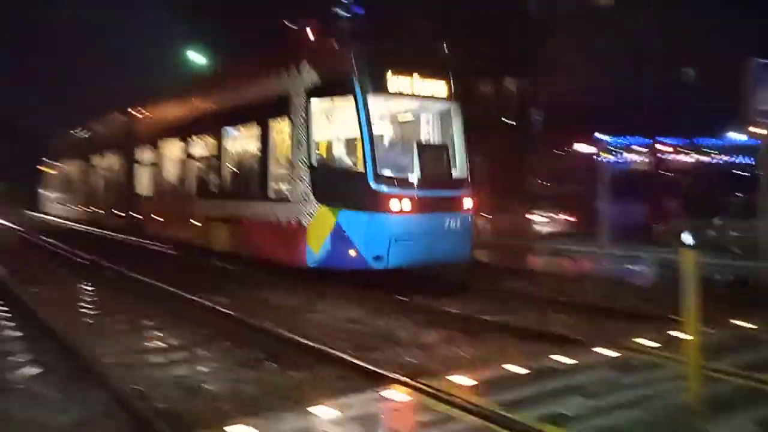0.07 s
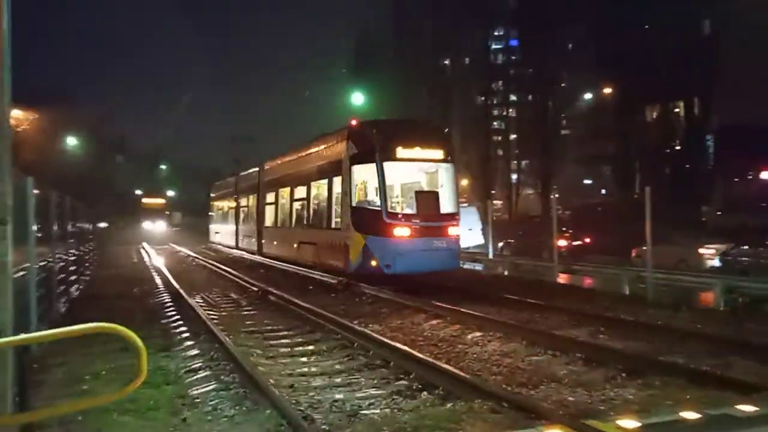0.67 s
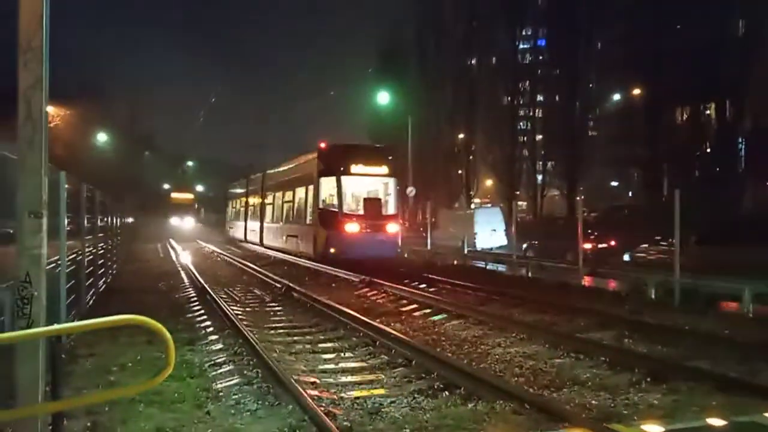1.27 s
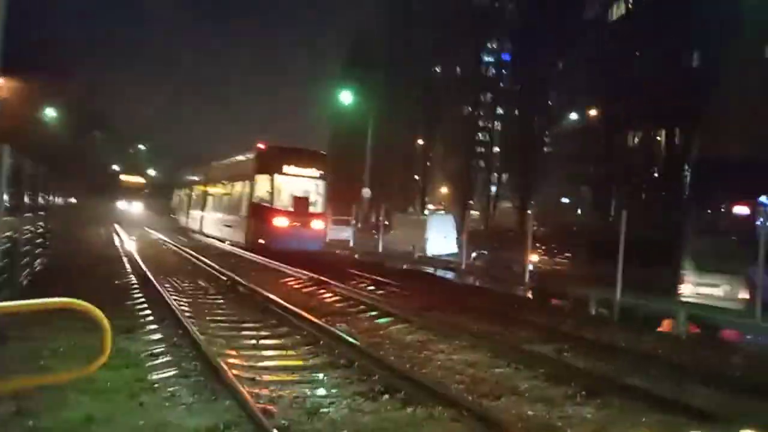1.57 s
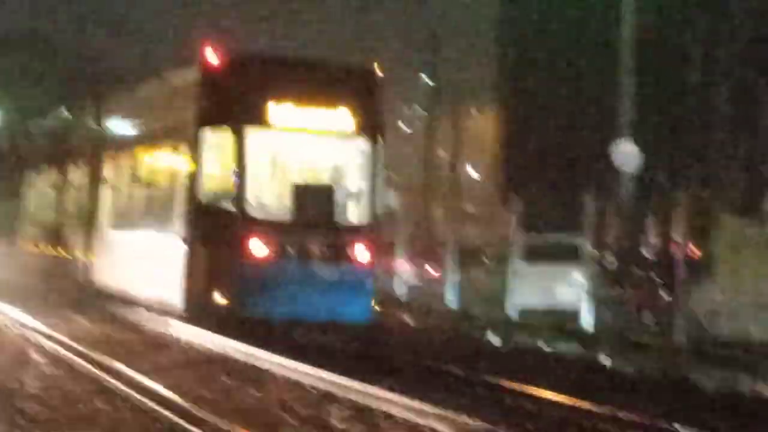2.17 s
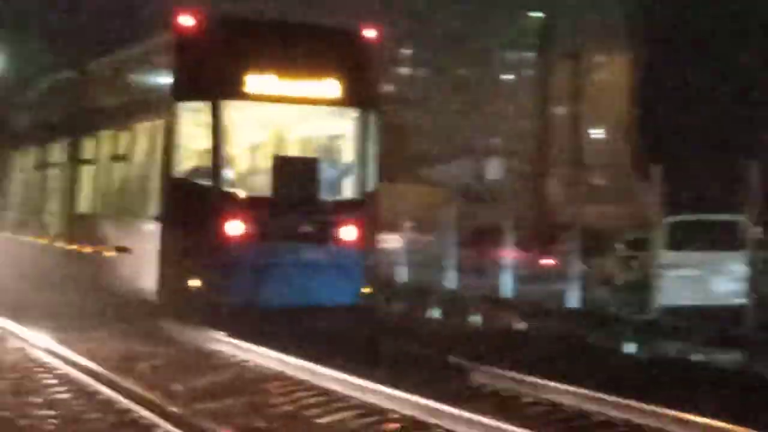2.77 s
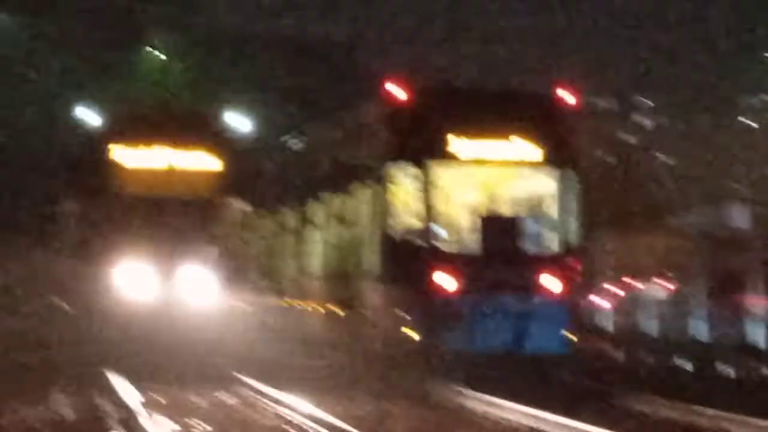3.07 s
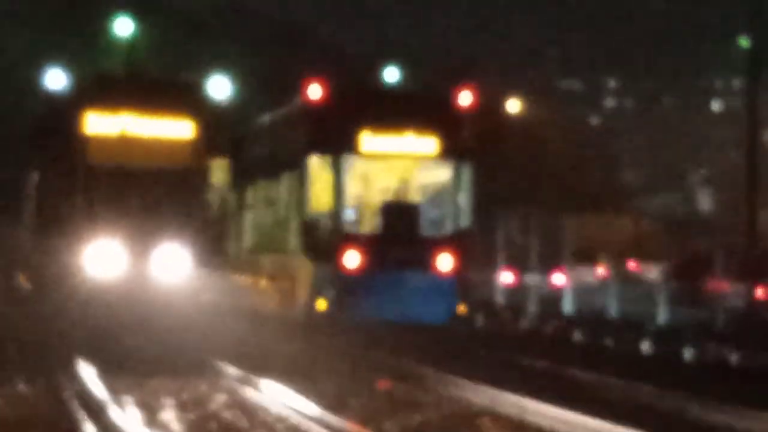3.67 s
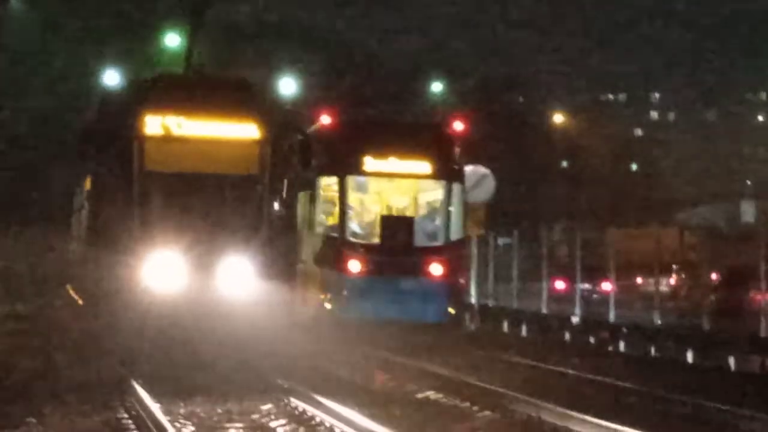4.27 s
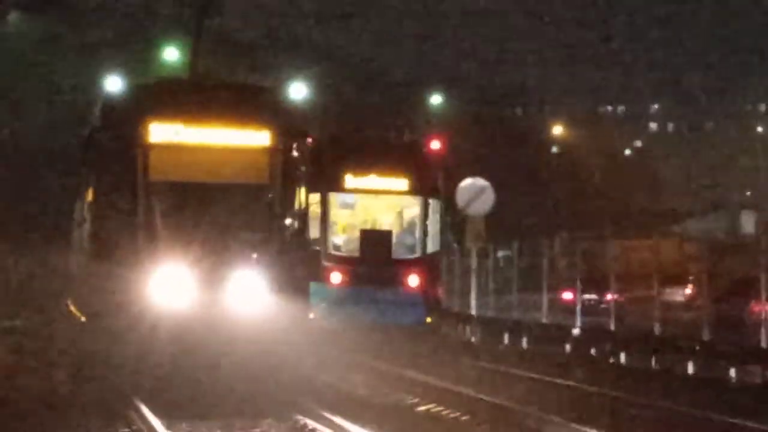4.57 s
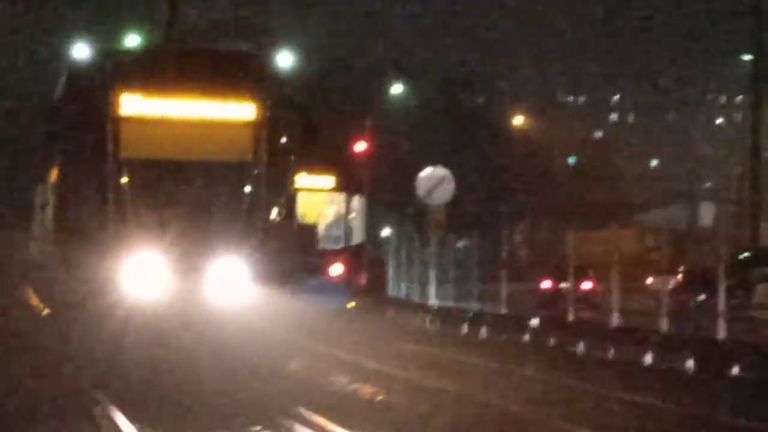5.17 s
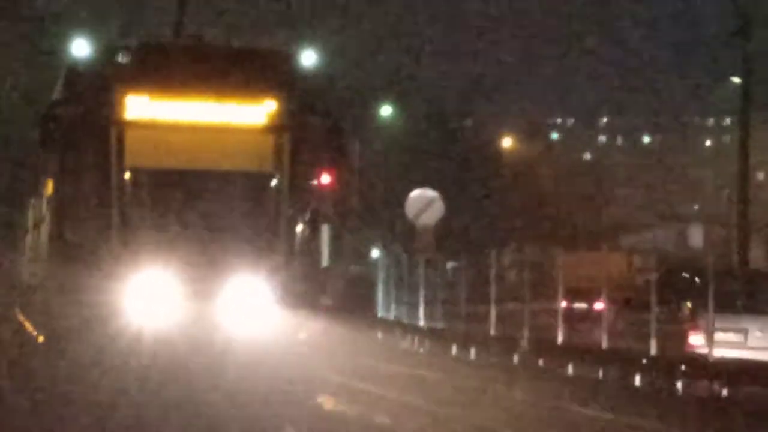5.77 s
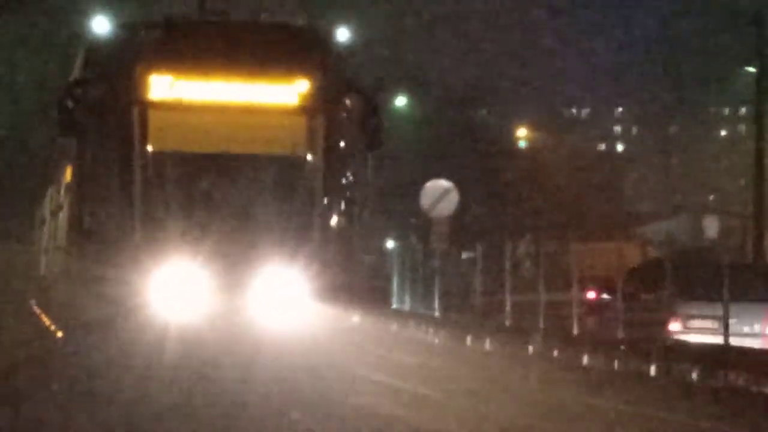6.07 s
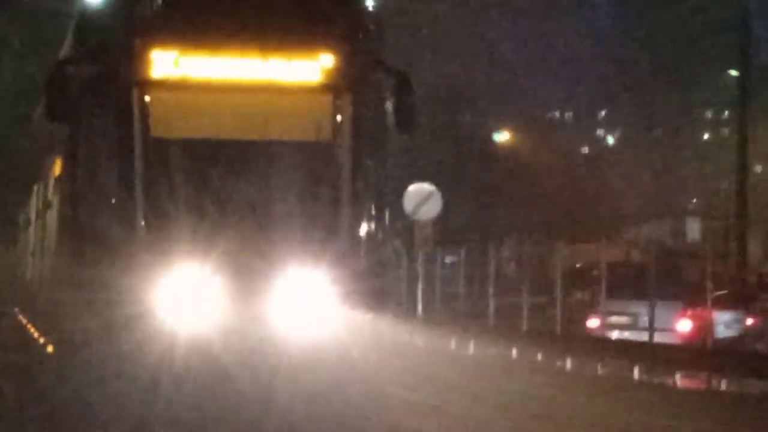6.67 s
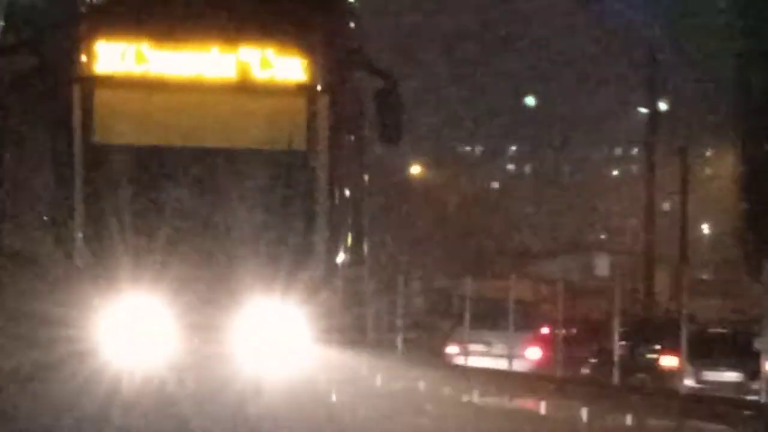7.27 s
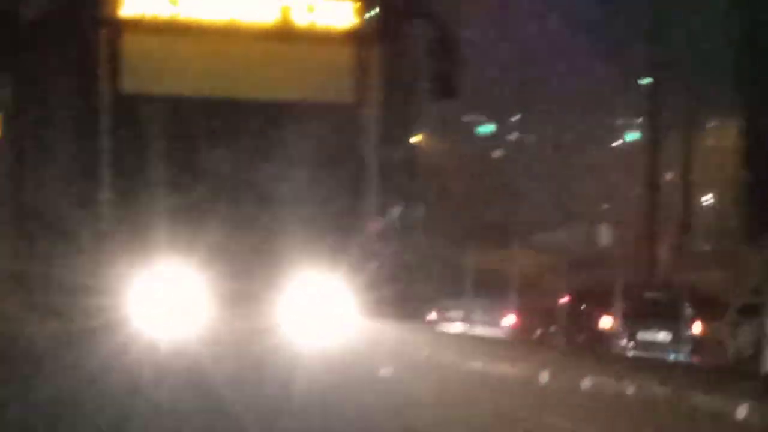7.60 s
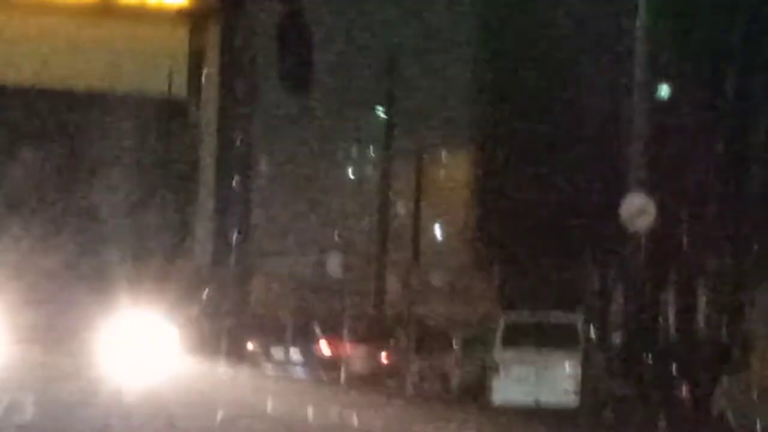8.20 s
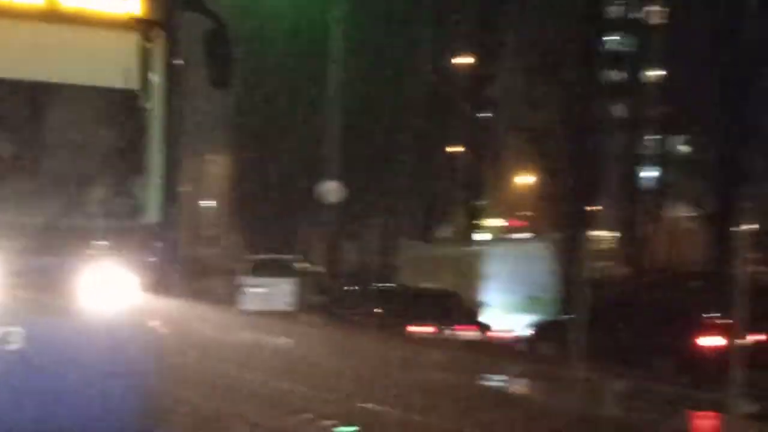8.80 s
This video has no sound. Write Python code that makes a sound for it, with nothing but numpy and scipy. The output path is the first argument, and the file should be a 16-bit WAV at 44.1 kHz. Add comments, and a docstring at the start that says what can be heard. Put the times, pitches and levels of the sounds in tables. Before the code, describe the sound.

Outdoors, close to the tracks, tram wheels roar and hiss on wet rail, clacking twice over a humming motor. Loud rubbing and low thumps soon take over as a finger seals the handheld microphone. From then on the street is a dull, low rumble, one tram fading and another slowly nearing. Scattered finger rubs and knocks sound on top, pause for about three seconds, then return briefly.

```python
"""Rumble and wheel hiss of a tram rolling away on wet rails at night, with a motor drone and two clacks.
After a second and a half a finger slides over the microphone port and seals it, an acoustic low-pass.
From then on the street is a muffled rumble, one tram fading as the next draws near, while the
shifting grip rubs by stick-slip friction and thumps by pressing air into the port."""
import sys
import numpy as np
from scipy import signal
from scipy.fft import rfft, irfft
from scipy.io import wavfile

SR = 44100
rng = np.random.default_rng(int(sys.argv[2]) if len(sys.argv) > 2 else 0)


def log_audio(samples):
    """Write samples as a 16-bit WAV file to the path given in sys.argv[1]."""
    # one column per channel
    frames = np.atleast_2d(samples).T
    # limit to full scale, then quantise
    limited = np.clip(frames, -1, 1)
    pcm = np.round(limited * 32767).astype(np.int16)
    wavfile.write(sys.argv[1], SR, pcm)


N = 398663
TIME_S, FREQ_HZ = np.arange(N) / SR, np.fft.rfftfreq(N, 1 / SR)


def amp(db):
    return 10 ** (np.asarray(db) / 20)


def unit(x):
    return x / np.sqrt(np.mean(x ** 2) + 1e-20)


def add(mix, start_s, sound):
    part = mix[round(start_s * SR):][:len(sound)]
    part += sound[:len(part)]


def curves(rows):
    """Linear interpolation of each column over time."""
    times, *columns = np.transpose(rows)
    return [np.interp(TIME_S, times, column) for column in columns]


def swell(start, rise, hold, release):
    """Raised-cosine envelope of height 1; times in seconds."""
    out, length = np.zeros(N), rise + hold + release
    t = np.arange(0, length, 1 / SR)
    ramp = np.clip(np.minimum(t / rise, (length - t) / release), 0, 1)
    add(out, max(start, 0), np.sin(np.pi / 2 * ramp) ** 2)
    return out


def filtered_noise(gain, size=N):
    """Source and filter: white noise weighted by a gain per frequency, at rms 1."""
    return unit(irfft(rfft(rng.standard_normal(size)) * gain, size))


def noise(spectrum):
    """Broadband noise whose spectral envelope is interpolated over log frequency."""
    hz, db = np.transpose(spectrum)
    return filtered_noise(amp(np.interp(np.log(FREQ_HZ + 1), np.log(hz + 1), db)))


def waver(rate_hz):
    """Random modulation: low-pass noise of rms 1."""
    return filtered_noise(np.exp(-(FREQ_HZ / rate_hz) ** 2))


def split(x, edges_hz):
    """Complementary crossover: the bands sum to x."""
    lowpasses = [1 / (1 + (FREQ_HZ / edge) ** 8) for edge in edges_hz]
    return irfft(rfft(x) * np.diff(lowpasses, axis=0, prepend=0, append=1), N)


def resonant_bursts(rows):
    """A randomly driven resonance gives a band of noise; each one swells and dies."""
    out = np.zeros(N)
    for start_s, length_s, db, centre_hz, width_hz in rows:
        size = round(length_s * SR)
        resonance = np.exp(-((np.fft.rfftfreq(size, 1 / SR) - centre_hz) / width_hz) ** 2)
        add(out, start_s, amp(db) * np.hanning(size) * filtered_noise(resonance, size))
    return out


def motor(hz, orders, jitter, waver_db):
    """A rotating shaft radiates at multiples of its rate; each order wavers in level on its own."""
    turns = np.cumsum(hz * (1 + jitter * waver(12))) / SR
    return unit(sum(amp(db + waver_db * waver(3.6)) * np.sin(2 * np.pi * (order * turns + rng.random()))
                    for order, db in orders))


# Spectrum of the tram in the open: frequency_hz, relative_density_db
TRAM_SPECTRUM = [(30, -31.5), (60, -12.5), (110, -4.5), (180, -5), (290, 0), (370, -11.5), (560, -15),
                 (900, -16.5), (1400, -20.5), (1900, -15.5), (2700, -16), (4600, -22.5), (6100, -17.5),
                 (7500, -24.5)]
# Wheels on wet rail: time_s, roar_db, hiss_db
ROLLING_LEVELS = [(0.0, -52.5, -53.5), (0.35, -50, -46.5), (0.95, -46, -48), (1.15, -45, -45),
                  (1.3, -46.5, -52.5), (1.44, -41.5, -44.5)]
def rolling_tram(body_db=-43.5, flutter_db=1.5, spray_db=0.84, patchy_db=2.0):
    """Roughness excitation: the body rumbles, the wheels roar and throw a fizzing film of water."""
    roar_db, hiss_db = curves(ROLLING_LEVELS)
    thud_power, clatter_power = thuds()
    edges_hz = [450, 750, 1150, 1700, 2400, 3400, 5000]
    rumble, *roar_bands, hiss = split(noise(TRAM_SPECTRUM), edges_hz)
    roar = sum(band * amp(patchy_db * waver(42)) for band in roar_bands)  # the rail's roughness varies
    clatter = sum(roar_bands[:3])  # the lower part of the roar swells with each thud
    flutter = flutter_db * np.tanh(waver(8.7))
    return (unit(rumble) * np.sqrt(amp(body_db) ** 2 + thud_power)
            + unit(roar) * amp(roar_db + flutter)
            + unit(clatter) * np.sqrt(clatter_power)
            + unit(hiss) * amp(hiss_db + 0.6 * flutter + spray_db * waver(250)))


# A brief low thud at the very start, then bogies jolting over uneven track:
# middle_s, length_s, thud_db, clatter_db
LOW_THUDS = [(0.01, 0.059, -36, -60), (0.507, 0.08, -53.5, -48), (0.57, 0.15, -42, -46.5),
             (0.743, 0.079, -33.5, -44.5), (0.792, .1, -39, -44)]
def thuds():
    """Incoherent sources add in power: what each thud adds to the rumble and the clatter."""
    thud_power, clatter_power = np.zeros((2, N))
    for middle_s, length_s, thud_db, clatter_db in LOW_THUDS:
        envelope = swell(middle_s - length_s / 2, length_s / 2, 0, length_s / 2)
        thud_power += (amp(thud_db) * envelope) ** 2
        clatter_power += (amp(clatter_db) * envelope) ** 2
    return thud_power, clatter_power


# Speed of the tram's motor: time_s, pitch_hz
MOTOR_SPEED = [(0.0, 57.45), (0.45, 61.8), (0.86, 75), (1.0, 73.74), (1.45, 66.6)]
# Its partials: shaft_multiple, relative_level_db
MOTOR_ORDERS = [(1, -2.5), (2, -2), (3, -3.5), (3.5, -15), (4, -12), (5, -23.5)]
def motor_drone(level_db=-39.5):
    """Pitch is proportional to shaft speed: the drone fades in, climbs and sinks a little."""
    pitch_hz, = curves(MOTOR_SPEED)
    envelope = swell(start=0.2, rise=0.29, hold=N / SR, release=1)
    return amp(level_db) * envelope * motor(pitch_hz, MOTOR_ORDERS, jitter=0.0037, waver_db=3.0)


# The rail singing under the wheels: start_s, length_s, level_db, centre_hz, width_hz
RAIL_SQUEALS = [(0.43, 0.062, -47, 2680, 110), (0.47, 0.07, -50, 2800, 110), (0.61, .07, -52.5, 2730, 111)]
def rail_song():
    """Wheel friction drives a narrow resonance of the rail."""
    return resonant_bursts(RAIL_SQUEALS)


# Wheels striking a rail joint: start_s, level_db, decay_60db_s
JOINT_IMPACTS = [(0.559, -32.5, .09), (0.788, -34, 0.14), (0.799, -43.5, 0.037)]
# Resonances of a wheel: centre_hz, width_hz, relative_level_db
WHEEL_MODES = [(950, 180, 2), (3000, 335, -1.5), (4180, 650, -2), (5910, 750, 2)]
def wheel_clacks():
    """Impact excitation: each blow rattles the wheel's modes, which decay exponentially."""
    out, t = np.zeros(N), np.arange(SR // 4) / SR
    hz = np.fft.rfftfreq(len(t), 1 / SR)
    response = sum(amp(db) / (1 + (2 * (hz - centre) / width) ** 2) for centre, width, db in WHEEL_MODES)
    for start_s, db, decay_s in JOINT_IMPACTS:
        add(out, start_s, filtered_noise(response, len(t)) * amp(db - 60 * t / decay_s))
    return out


COVER_START_S, COVER_END_S = 1.415, 1.55
def finger_shadow(street, closed):
    """Acoustic shadowing: the nearing finger blocks short wavelengths first, then the rest."""
    lower, treble = split(street, [4500])
    return lower * (1 - closed) + treble * (1 - closed) ** 7


# Spectrum of the street through the finger: frequency_hz, relative_density_db
MUFFLED_SPECTRUM = [(25, -34.5), (43, -14), (65, -6), (130, -1.5), (220, -4.5), (340, -17), (480, -24),
                    (680, -25), (1250, -29), (1600, -32.5), (2000, -31), (2750, -35), (4000, -44.5),
                    (5700, -53), (8000, -61.5)]
# Leak past the finger, changing as the grip shifts: time_s, leak_db
SEAL_LEAK = [(2.1, 0.5), (2.7, -3), (3.1, -7), (3.62, 1), (3.87, 2.5), (4.25, -2.5), (5.15, -7.5),
             (6.3, -10), (8.1, -7), (8.97, -9.5)]
def muffled_street(fade_db_per_s=2, growth_db_per_s=3.5):
    """Transmission loss is least in the bass: two trams rumble through, while higher sound leaks in."""
    leak_db, = curves(SEAL_LEAK)
    rumble, traffic_wash, wheel_sheen = map(unit, split(noise(MUFFLED_SPECTRUM), [450, 1700]))
    leaving = amp(-47.5 - fade_db_per_s * (TIME_S - COVER_END_S))
    oncoming = amp(-52 - growth_db_per_s * (N / SR - TIME_S))
    leak = traffic_wash * amp(-67.5 + leak_db) + wheel_sheen * amp(-75 + 0.5 * leak_db)
    return rumble * np.hypot(leaving, oncoming) + leak


# Skin sliding over the port: start_s, rise_s, hold_s, release_s, gain_db, tilt_db_per_octave
FINGER_STROKES = [(1.445, 0.045, 0.021, 0.069, -19, 5.5), (1.527, 0.09, .01, 0.034, -19.5, 4.5),
                  (1.63, 0.022, 0.019, 0.026, -19.5, 4), (1.748, 0.015, 0.027, 0.021, -17, 4),
                  (1.783, .035, 0.0081, 0.038, -17.5, 6.5), (2.263, .016, 0.015, 0.021, -36.5, -2.5),
                  (2.782, 0.046, 0.012, 0.1, -31.5, -1.5), (2.877, 0.072, 0.069, 0.025, -29.5, -2),
                  (3.11, 0.051, 0.034, 0.038, -31, -2.5), (3.19, 0.046, 0.03, 0.065, -26, -2),
                  (3.337, 0.045, 0.019, 0.052, -25.5, 0.5), (3.476, 0.086, .01, 0.028, -31.5, -1.5),
                  (3.967, 0.07, 0.013, 0.029, -44, -3), (4.418, 0.027, .003, 0.04, -30, -0.5),
                  (4.716, 0.0086, .003, 0.011, -52, -6), (4.751, 0.0072, 0.011, 0.028, -23, 1),
                  (4.94, 0.0059, .013, 0.015, -25.5, 2), (8.244, .009, .014, 0.037, -28, -0.5),
                  (8.259, 0.022, 0.034, 0.066, -31.5, 1.2), (8.309, 0.054, .11, .1, -48.5, 0.5),
                  (8.406, 0.022, .005, 0.026, -42.5, 3.5), (8.512, 0.072, 0.017, 0.049, -43, -2),
                  (8.667, 0.023, .012, 0.097, -48.5, -1), (8.775, .022, .008, .022, -39.5, -3),
                  (8.82, 0.014, 0.0074, 0.034, -43, -6.5)]
def strokes(dulling_db_per_octave=4, brush_s=0.017, brush_db=-21, brush_db_per_octave=-2.5):
    """Friction noise grows stronger and brighter with sliding speed: its amplitude and spectral tilt."""
    power, weighted_tilt = np.zeros((2, N))
    for start, rise, hold, release, db, tilt in FINGER_STROKES:
        speed = swell(start, rise, hold, release)
        slide_power = (amp(db) * speed) ** 2
        # the skin brushes lightly just before and after each stroke
        touch = swell(start - brush_s, rise + brush_s, hold, release + brush_s)
        brush_power = (amp(db + brush_db) * touch) ** 2
        power += slide_power + brush_power
        weighted_tilt += slide_power * (tilt - dulling_db_per_octave * (1 - speed))
        weighted_tilt += brush_power * brush_db_per_octave
    return np.sqrt(power), weighted_tilt / (power + 1e-20)


# Spectrum of rubbing skin before the tilt: frequency_hz, relative_density_db
SKIN_SPECTRUM = [(25, -29.5), (45, -9), (80, -1.5), (160, 1.5), (400, -5), (800, -14), (1400, -21),
                 (2400, -30), (3300, -37.5), (4500, -48.5), (6500, -59.5), (8000, -71.5)]
def finger_rubs(closed, grain_db=1.0, slips_hz=220, pivot_hz=700, patchy_db=1.17, bass_share=0.35):
    """Stick-slip friction of skin on the case makes a grainy noise; a resting finger is silent."""
    strength, tilt = strokes()
    centres_hz = np.geomspace(88, 5600, 7)
    bands = split(noise(SKIN_SPECTRUM), centres_hz[:-1] * np.sqrt(2))
    bands[:3] *= closed ** 3  # bass pressure builds up only in a sealed port
    octaves = np.log2(centres_hz / pivot_hz)
    weights = np.where(octaves > 0, octaves, bass_share * octaves)  # speed changes the bass less
    slide = sum(band * amp(tilt * weight + patchy_db * waver(50)) for band, weight in zip(bands, weights))
    return slide * strength * amp(grain_db * waver(slips_hz))


# The fingertip squeaking on the case: start_s, length_s, level_db, centre_hz, width_hz
SKIN_SQUEAKS = [(1.458, 0.08, -22.5, 1590, 1300), (4.437, .02, -39.5, 1710, 1210),
                (8.655, 0.029, -65.5, 2140, 300.4), (8.748, 0.051, -58, 1770, 494),
                (8.765, 0.045, -68, 2280, 493)]
def finger_squeaks():
    """Skin friction briefly drives a broad resonance."""
    return resonant_bursts(SKIN_SQUEAKS)


# The finger pressing air into the port: start_s, peak_db, push_ms, tick_db
FINGER_PRESSES = [(1.528, -8.5, 0.55, -33), (1.568, -7.5, 0.8, -40), (1.578, -9, 1.8, -45),
                  (1.751, -17.5, 0.38, -40.5), (1.759, -12, 0.73, -17.5), (1.774, -7.5, 0.65, -27),
                  (1.808, -12, 0.52, -18), (2.804, -15, 0.48, -34.5), (3.119, -12, 0.84, -29),
                  (3.938, -26.5, 0.87, -39), (4.444, -33, 1.3, -30.5), (4.755, -12.5, 0.62, -29),
                  (4.761, -19, 2.5, -35), (4.944, -8, 0.77, -27.5), (8.205, -38.5, 0.59, -53.5),
                  (8.250, -20, .9, -33), (8.257, -14, 0.34, -26.5), (8.26, -20, 3.8, -35),
                  (8.765, -31, 0.96, -68), (8.831, -29.5, 1.8, -55)]
# Spectrum of the contact tick: frequency_hz, relative_density_db
TICK_SPECTRUM = [(100, -8), (600, 6), (1300, 0.5), (2500, -14.5), (4500, -30), (8000, -46)]
def finger_thumps(bass_cut_hz=78, tick_ms=1.5):
    """High-pass transient: the microphone's bass cut turns each push into slowing swings; skin ticks."""
    thumps, tick_envelope = np.zeros((2, N))
    ms = np.arange(SR // 12) * 1000 / SR
    bass_cut = signal.butter(4, bass_cut_hz, "highpass", fs=SR, output="sos")
    tick_shape = 2 * ms / tick_ms * np.exp(1 - 2 * ms / tick_ms)
    for start_s, peak_db, push_ms, tick_db in FINGER_PRESSES:
        pressure = -(ms / push_ms) ** 2 * np.exp(-ms / push_ms)
        swing = signal.sosfilt(bass_cut, pressure)
        add(thumps, start_s, amp(peak_db) * swing / abs(swing).max())
        add(tick_envelope, start_s, amp(tick_db) * tick_shape)
    return thumps + tick_envelope * noise(TICK_SPECTRUM)


# The case cracking under the grip: start_s, level_db
CASE_CRACKS = [(4.446, -57), (4.9459, -43.5), (8.2578, -42)]
def case_cracks(length_s=0.003, centre_hz=4600, width_hz=1900):
    """Stress release in the pressed case gives a very short, bright burst."""
    return resonant_bursts([(start_s, length_s, db, centre_hz, width_hz) for start_s, db in CASE_CRACKS])


# Motors in the traffic: start_s, rise_s, hold_s, release_s, level_db, pitch_hz
TRAFFIC_MOTORS = [(4.494, 0.42, 0.68, .35, -61.5, 63.9), (7.279, 0.11, 0.28, 0.33, -58.5, 86.5)]
# Their partials: shaft_multiple, relative_level_db
TRAFFIC_ORDERS = [(1, 2), (2, -10), (3, -12)]
def traffic_hums():
    """Low shaft harmonics pass the finger; each motor swells and fades on its own pitch."""
    return sum(amp(db) * swell(*timing) * motor(pitch_hz, TRAFFIC_ORDERS, jitter=0.01454, waver_db=6.0)
               for *timing, db, pitch_hz in TRAFFIC_MOTORS)


# The next tram's wheels singing: start_s, length_s, level_db, centre_hz, width_hz
DISTANT_SQUEALS = [(4.75, 1.6, -90.5, 5480, 1090), (5.45, 0.75, -84, 2760, 330),
                   (6.45, 1.67, -79, 2274, 900)]
def distant_wheel_song():
    """Friction on the wet rail drives wheel resonances, faint with distance."""
    return resonant_bursts(DISTANT_SQUEALS)


def scene():
    """Superposition: the open street gives way to the muffled one, and handling noise adds to both."""
    closed = np.interp(TIME_S, [COVER_START_S, COVER_END_S], [0, 1])
    street = rolling_tram() + motor_drone() + rail_song() + wheel_clacks()
    muffled = muffled_street() + traffic_hums() + distant_wheel_song()
    handling = finger_rubs(closed) + finger_squeaks() + finger_thumps() + case_cracks()
    return (finger_shadow(street, closed) + closed * muffled + handling)[None]


LOW_CUT_HZ, HIGH_CUT_HZ = 35, 7600
def record(dry):
    """The microphone is a band-pass: it drops the deepest bass and the top treble."""
    highpass = signal.butter(2, LOW_CUT_HZ, "highpass", fs=SR, output="sos")
    lowpass = signal.firwin(121, HIGH_CUT_HZ, window=("kaiser", 8), fs=SR)
    return signal.oaconvolve(signal.sosfilt(highpass, dry), lowpass[None], "same")


dry = scene()
out = record(dry)
log_audio(out)
```